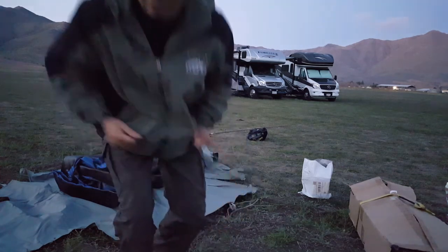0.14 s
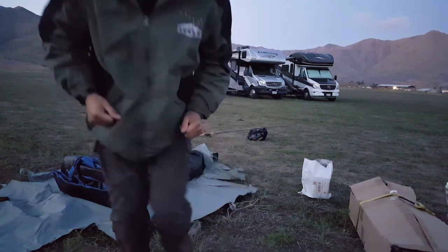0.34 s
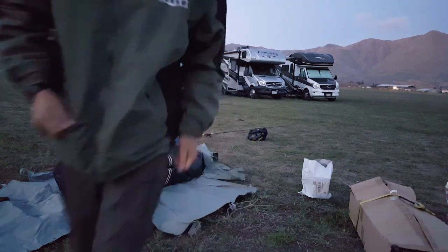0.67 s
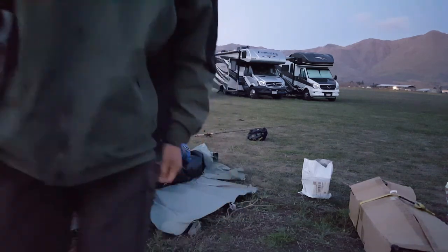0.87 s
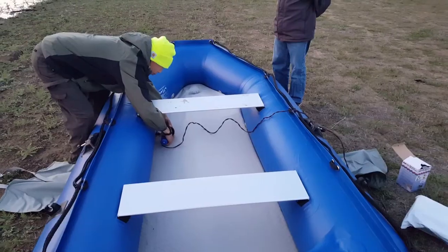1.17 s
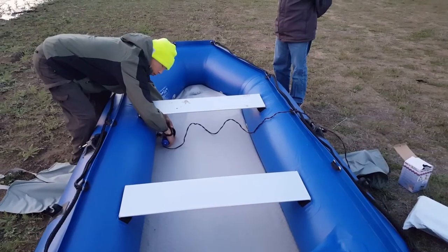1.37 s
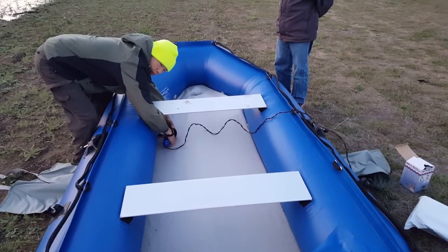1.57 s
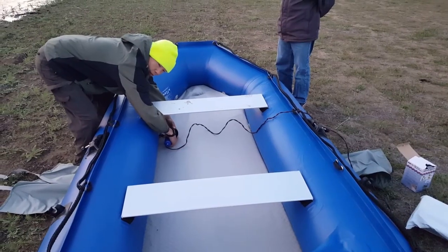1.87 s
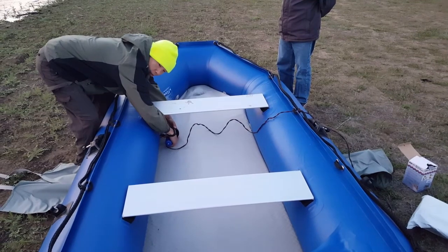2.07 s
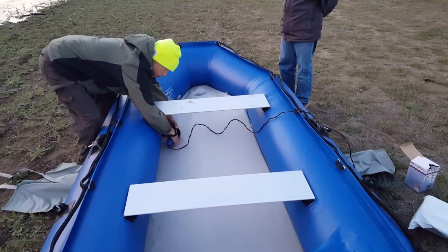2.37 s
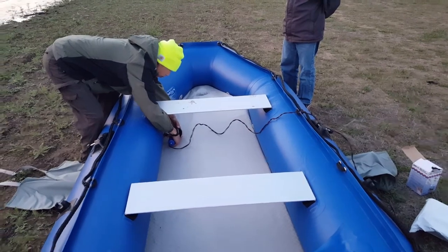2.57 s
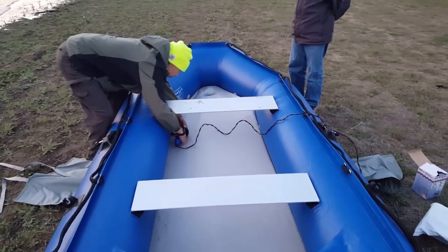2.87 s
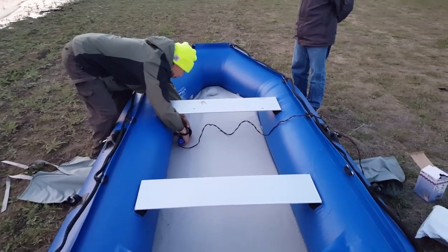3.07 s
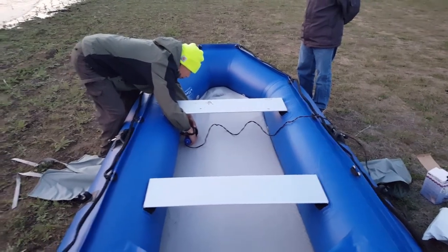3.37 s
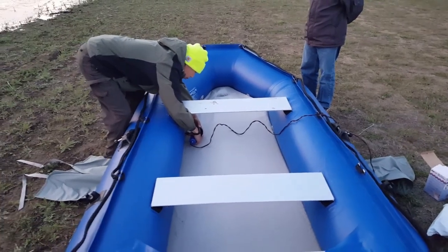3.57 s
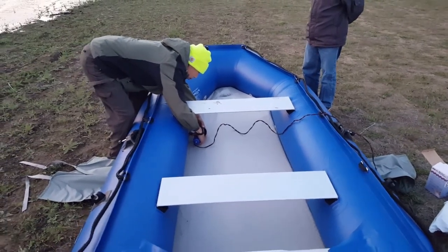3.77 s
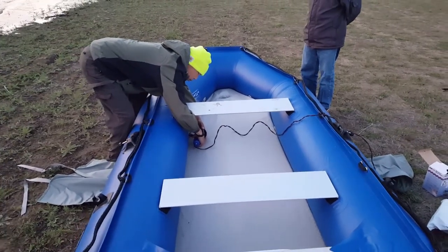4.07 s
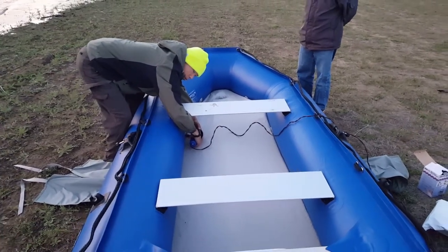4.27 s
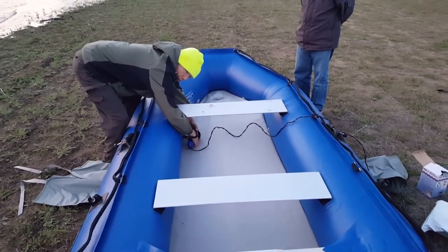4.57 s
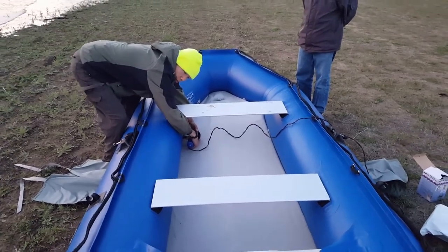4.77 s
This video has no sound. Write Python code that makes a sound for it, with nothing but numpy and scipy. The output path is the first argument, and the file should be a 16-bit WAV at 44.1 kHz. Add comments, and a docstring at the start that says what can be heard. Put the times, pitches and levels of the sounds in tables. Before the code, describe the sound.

Outdoors on open grass, a person in a nylon jacket passes close to the microphone with swishes, dull crunching steps and low rumble. After about a second this cuts abruptly to a small electric pump already running at an inflatable boat: a piercing high whine, buzzing motor hum and rushing, hissing air, with light wind puffs and a couple of knocks. Stereo, close, no obvious room echo.

```python
"""Lakeside campsite, walk and inflatable boat pump

Someone in a nylon jacket walks past over grass, above a low outdoor rumble: shaped noise and short crunches.
Abruptly a small electric air pump is running inside an inflatable boat: tones locked to one shaft angle
make a piercing blade whine that creeps up in pitch, and motor tones under it. Shaped noise makes the air
rushing through housing and valve, whose tube sings. A light breeze touches the microphone; a few knocks fall."""
import sys
import numpy as np
from scipy import signal
from scipy.fft import rfft, irfft
from scipy.io import wavfile

SR = 44100
rng = np.random.default_rng(int(sys.argv[2]) if len(sys.argv) > 2 else 0)


def digitize_waveform(pressure):
    """Quantize a signal to 16-bit integers and store it at the path in sys.argv[1].

    Rows of a 2-D input are taken as channels; values are limited to [-1, 1].
    """
    field = np.atleast_2d(pressure).T
    bounded = np.clip(field, -1, 1)
    quanta = np.round(bounded * 32767).astype(np.int16)
    wavfile.write(sys.argv[1], SR, quanta)


N = 217796
T = np.arange(N) / SR
HZ = np.maximum(np.arange(N // 2 + 1) * SR / N, 1)
WALK_END_S, PUMP_ON_S = 1.113, 1.1235
CUTOFF_HZ = 14480

# Low rumble during the walk. Each row: time in seconds, level in dB.
RUMBLE_LEVEL = [(0, -57.5), (.25, -59), (.45, -56), (.62, -56), (.8, -51), (1.11, -54.5)]
# Colours of the rumble, the open field and the nylon. Each row: frequency in Hz, density in dB per Hz.
RUMBLE_COLOUR = [(20, -36), (45, -9), (75, 4.5), (100, 2), (135, 0), (250, -7.5), (500, -48)]
FIELD_COLOUR = [(100, -5), (250, -2), (450, -1), (900, -5), (1500, -9.5), (2500, -17), (4000, -24.5),
                (9000, -35.5), (14500, -51)]
JACKET_COLOUR = [(200, 3), (800, 4.5), (1800, 6.5), (3000, 0), (5000, -4.5), (8500, -4), (10500, -13),
                 (14000, -10)]
# Nylon rubs at each swing of arm or leg. Each row: centre in seconds, length in seconds, level in dB.
SWISHES = [(.02, 0.092, -61.5), (0.321, 0.11, -59.5), (.5, .08, -60), (.79, 0.15, -55), (1.058, 0.098, -58)]
JACKET_REST_DB = -67
# Steps and small knocks. Each row: start in seconds, level in dB, centre in Hz, t60 in seconds.
STEPS = [(0.141, -42.5, 640, 0.038), (0.167, -47.5, 1210, 0.038), (0.284, -54, 1590, 0.064),
         (0.29, -42, 490, 0.093), (0.292, -46.5, 1480, 0.031), (0.332, -45, 376, 0.077),
         (.577, -51, 1400, .025), (0.576, -56, 8000, 0.018), (0.736, -52, 900, 0.041),
         (.828, -51.5, 1830, .07), (0.846, -46, 423, 0.13), (0.8882, -49, 550, 0.057),
         (3.261, -42, 227, 0.096), (3.266, -33.5, 750, 0.054), (3.614, -48, 197, 0.077)]

# Puffs of breeze on the microphone.
# Each row: centre in seconds, length in seconds, low wind in dB, buffet in dB (both before the lumps).
PUFFS = [(1.165, 0.26, -60, -77), (1.47, 0.091, -53.5, -70), (1.62, .1, -72, -63), (1.985, .06, -58, -64),
         (2.326, .1, -58, -71), (2.754, 0.049, -54, -76), (2.874, 0.11, -53.5, -59),
         (2.972, 0.057, -57, -68), (3.273, 0.13, -56, -51.5), (3.424, 0.071, -56, -53),
         (3.56, 0.097, -58, -56), (3.683, 0.098, -66, -49.5), (4.24, 0.22, -57, -69),
         (4.482, 0.12, -57, -58.5), (4.88, 0.066, -56, -58)]
CALM_WIND_DB, CALM_BUFFET_DB = -70.5, -68.5
# Colours of low wind and of buffet. Each row: frequency in Hz, density in dB per Hz.
WIND_COLOUR = [(20, -31), (45, -8.5), (80, 2), (130, -3), (200, -9), (400, -26.5)]
BUFFET_COLOUR = [(30, -30), (70, -6), (140, -3.5), (230, -0.5), (380, -7.5), (650, -9.5), (1200, -32)]

# Stereo image of each noise. Each row: frequency in Hz, left-right likeness (-1 to 1), left minus right in dB.
FIELD_STEREO = [(60, 0.9, -0.5), (284, 0.93, 0.5), (630, 0.7, 1), (1380, 0.13, 2.5), (3000, 0.44, 1),
                (4280, 0.23, -4), (8140, 0.12, 5), (13900, -0.2, 7)]
WIND_STEREO = [(60, .05, 0), (300, 0.084, 1)]
PUMP_STEREO = [(150, 0.46, .5), (700, 1, 0), (1300, 0.87, -0.5), (2370, 0.46, 1.5), (3370, 0.67, 0.5),
               (4540, -0.14, -2), (6280, -0.35, -8.5), (8200, 0.16, 12), (14100, -0.12, 1.5)]

# Air flow through the pump. Each row: time in seconds, flow in dB (the hiss lies a fixed step above it).
FLOW = [(1.16, -49.5), (1.59, -49), (2.08, -49), (3.87, -47.5), (4.9, -48.5)]
HISS_OVER_FLOW_DB = 6.5
RUSH_DB, RUSH_FOLLOWS = -40.5, .7  # rush at mean flow; its share of the flow's swing in dB
# Surges of air through the valve. Each row: centre in seconds, length in seconds, lift of the rush in dB.
SURGES = [(1.338, .1, 1.5), (1.604, 0.19, 2.5), (1.852, 0.064, 1), (2.12, 0.13, 0.9), (2.415, 0.18, 1.5),
          (2.667, .16, 1.5), (2.94, 0.11, 1.6), (3.263, 0.15, 2), (3.473, 0.051, 1), (3.66, 0.31, 2),
          (3.944, 0.19, 1), (4.468, 0.21, 2), (4.72, 0.07, 1.64)]
# Colours of rush and hiss. Each row: frequency in Hz, density in dB per Hz.
RUSH_COLOUR = [(50, -45), (150, -22), (350, -28), (420, -12.5), (510, -15), (580, -8.5), (1000, -5.5),
               (1090, -12), (1350, -2), (1620, -10), (2100, -4.5), (3200, -5.5), (3800, -14), (5000, -20),
               (8000, -47)]
HISS_COLOUR = [(2000, -12), (3800, -5.5), (4600, -0.5), (5200, 3), (6300, 0), (6800, 3), (8100, -0.5),
               (8800, -4.5), (9600, -15), (12400, -7.5), (13400, -3.5), (14400, -6)]
# Air resonances of housing and outlet. Each row: frequency in Hz, width in Hz, lift in dB.
HOUSING = [(761, 216, 7.5), (1158, 98, 10.5), (2460, 170, 5.5)]
OUTLET = [(5500, 300, 0.5), (6230, 180, 2), (8300, 240, -0.5)]

# The valve tube resonates close to the fourth multiple of the shaft rate.
# It sings more as the boat fills, and most in the surges.
TUBE_HZ, TUBE_WIDTH_HZ = 1158.6, 15
TUBE_START_DB, TUBE_RISE_DB_PER_S, TUBE_DB_PER_SURGE_DB = -56.5, 2.5, 4.5

# The motor creeps towards its top speed; SETTLE_S is the time constant.
START_TURNS_PER_S, TOP_TURNS_PER_S, SETTLE_S = 281.18, 293.21, 3.734
# Motor and housing tones. Each row: multiple of the shaft rate, left in dB rms, right in dB rms,
# growth over the run in dB, waver in dB (only a share of it is used in common and in each channel).
MOTOR = [(.75, -63.5, -61.5, -0.5, 0.5), (1, -59, -58.5, 0.5, 0.5), (2, -62.5, -67.5, 6, -3.5),
         (2.5, -59.5, -59, 4, 5), (6.75, -59, -69, -4, 8), (7.5, -53.5, -53, 0.5, 4),
         (8, -55.5, -53.5, 4.5, 1.5), (9, -53, -52.5, -4, -0.5), (10, -58, -70, -13, 7),
         (12.5, -69, -60, -14, 5), (13.5, -63.5, -76, -7, 3.5), (15, -63, -74, -4, 1),
         (18, -73, -64, 23, 0)]
# Hum on the fifth multiple. Each row: time in seconds, level in dB rms.
HUM = [(1.12, -55), (1.3, -55), (1.56, -47), (3.6, -47), (3.95, -53), (4.94, -51)]

# The blade whine as pump and listener move.
# Each row: time in seconds, left peak in dB, right peak in dB, lead of the left channel in radians.
WHINE = [(1.12, -36.5, -32, -0.5), (1.36, -35.5, -28, -2.5), (1.6, -32, -31.5, .5),
         (1.85, -48.5, -27.5, 2.5), (2.12, -30, -21, -4.5), (2.36, -42, -26, -4.5),
         (2.7, -35.5, -22.5, -1.5), (3.05, -45, -29.5, -1.5), (3.35, -40, -28.5, -3), (3.6, -50, -33.5, 0),
         (3.92, -34, -31.5, -5), (4.32, -40, -27.5, -2.5), (4.48, -36.5, -27, -2.5),
         (4.62, -40, -29.5, -5.5), (4.94, -41.5, -34, 1)]
# Echoes off the boat briefly cancel the whine; a negative dip is a lift.
# Each row: centre in seconds, length in seconds, left dip in dB, right dip in dB.
FADES = [(1.26, 0.061, 1, 12), (1.498, 0.062, 6, 26), (1.795, 0.039, 0, 11), (1.994, 0.15, -0.5, 13),
         (2.08, 0.063, -2, 20), (2.32, 0.042, 1, 15), (2.515, 0.043, -5, 11.5), (2.659, 0.043, 1, 13.5),
         (2.82, 0.041, 12, 21), (3.128, 0.019, -4, 11), (3.45, 0.071, 10, 3), (3.643, 0.04, 0, 14),
         (3.883, 0.071, -0.5, 6), (4.103, 0.071, 13, -1.5), (4.2, 0.073, -1, 6.5), (4.494, 0.056, 0, 12),
         (4.81, 0.044, 8, 12)]
# The whine's octave, then the top whistle. Each row: time in seconds, left peak in dB, right peak in dB.
OCTAVE = [(1.12, -38.5, -63), (1.5, -47.5, -57), (1.74, -38, -52), (2.15, -45, -45), (2.66, -35.5, -42),
          (2.82, -48, -55), (3.1, -45.5, -52.5), (3.85, -39.5, -56), (4.65, -43, -51), (4.94, -58, -54)]
WHISTLE = [(1.12, -46, -59), (1.56, -43.5, -55), (2.2, -50, -59), (2.76, -44, -57), (3.2, -59.5, -71),
           (3.55, -52, -59), (4.08, -47, -45.5), (4.94, -60, -45.5)]


def from_db(db):
    """Decibels to gain."""
    return 10 ** (np.asarray(db) / 20)


def rms_one(x):
    """Scale to unit power."""
    return x / np.sqrt(np.mean(x ** 2))


def in_time(rows):
    """Each column of a curve at every sample."""
    s, *columns = np.transpose(rows)
    return np.array([np.interp(T, s, column) for column in columns])


def in_frequency(rows):
    """Each column of a spectrum at every frequency bin, on a log frequency scale."""
    hz, *columns = np.transpose(rows)
    return np.array([np.interp(np.log(HZ), np.log(hz), column) for column in columns])


def swell(s, length_s):
    """A smooth bump of height 1 centred on s, length_s wide at half height."""
    return .5 ** ((2 * (T - s) / length_s) ** 2)


def notch(s, length_s):
    """A pointed dip of depth 1, length_s wide at half depth, as when two paths cancel."""
    return .5 ** (2 * np.abs(T - s) / length_s)


def drift(rate_hz):
    """Slow random wander of spread 1: white noise rolled off above rate_hz."""
    spectrum = rfft(rng.standard_normal(N))
    return rms_one(irfft(spectrum / (1 + (HZ / rate_hz) ** 2) ** 2, N))


def resonate(x, hz, width_hz):
    """A two-pole resonance with gain 1 on top."""
    r = np.exp(-np.pi * width_hz / SR)
    zeros = np.array([1, 0, -1]) * (1 - r * r) / 2
    poles = [1, -2 * r * np.cos(2 * np.pi * hz / SR), r * r]
    return signal.lfilter(zeros, poles, x)


def resonate_twice(x, hz, width_hz):
    """Two equal resonances in a row at unit power, for steeper skirts."""
    return rms_one(resonate(resonate(x, hz, width_hz), hz, width_hz))


def noise(colour, stereo, resonances=(), lead_s=0):
    """Coloured stereo noise of unit power, lifted at its resonances; the left channel leads by lead_s."""
    colour_db = in_frequency(colour)[0]
    for hz, width_hz, lift_db in resonances:
        colour_db = colour_db + lift_db / (1 + (2 * (HZ - hz) / width_hz) ** 2)
    alike, pan_db = in_frequency(stereo)
    alike = np.clip(alike, -1, 1)
    mid, side = rfft(rng.standard_normal((2, N)))
    sides = np.array([[1], [-1]])  # left, right
    pair = np.sqrt(1 + alike) * mid + sides * np.sqrt(1 - alike) * side
    pair = pair * np.exp(1j * np.pi * HZ * lead_s * sides)
    return rms_one(irfft(pair * from_db(colour_db + sides * pan_db / 2), N))


def walk():
    """Low rumble, the open field, and nylon rubbing in swells: noise shaped in colour and level."""
    lead_s = .0001
    rubbing = from_db(JACKET_REST_DB)
    for s, length_s, level_db in SWISHES:
        rubbing = rubbing + from_db(level_db) * swell(s, length_s)
    rumble = from_db(in_time(RUMBLE_LEVEL)) * noise(RUMBLE_COLOUR, FIELD_STEREO, lead_s=lead_s)
    field = from_db(-54.0 + 0.88 * drift(28)) * noise(FIELD_COLOUR, FIELD_STEREO, lead_s=lead_s)
    jacket = rubbing * from_db(1.2 * drift(90)) * noise(JACKET_COLOUR, FIELD_STEREO, lead_s=lead_s)
    return rumble + field + jacket


def breeze(lumpy_db):
    """Puffs of lumpy eddies at the microphone: low wind and a higher buffet, nearly unlike left and right."""
    levels = from_db([[CALM_WIND_DB], [CALM_BUFFET_DB]])
    for s, length_s, *levels_db in PUFFS:
        levels = levels + np.outer(from_db(levels_db), swell(s, length_s))
    wind, buffet = levels
    lumps = from_db(lumpy_db * np.array([drift(41), drift(18)]))  # left, right
    return lumps * (wind * noise(WIND_COLOUR, WIND_STEREO) + buffet * noise(BUFFET_COLOUR, WIND_STEREO))


def steps(width_share, apart, onset_db):
    """Each footfall or knock is a short dying crunch of noise around one pitch, its onset set by onset_db."""
    out = np.zeros((2, N))
    for s, level_db, hz, t60 in STEPS:
        grit = rng.standard_normal(N) + apart * rng.standard_normal((2, N))
        crunch = resonate_twice(grit, hz, width_share * hz)
        age = np.maximum(T - s, 0)
        envelope_db = level_db - 60 * age / t60 + onset_db * np.exp(-age / 0.0055)
        out += crunch * (T >= s) * from_db(envelope_db)
    return out


def surge_db():
    """How far the surges lift the rush of air."""
    return sum(lift_db * swell(s, length_s) for s, length_s, lift_db in SURGES)


def air(angle, chop):
    """Air rushes through the housing in small surges; rush and hiss are chopped a little by the turning."""
    flow_db, = in_time(FLOW)
    rush_db = RUSH_DB + RUSH_FOLLOWS * (flow_db - flow_db.mean()) + surge_db()
    rush_gain = from_db(rush_db + 0.89 * drift(34))
    rush = rush_gain * noise(RUSH_COLOUR, PUMP_STEREO, HOUSING, lead_s=.00003)
    hiss_gain = from_db(flow_db + HISS_OVER_FLOW_DB + 0.7 * drift(40))
    hiss = hiss_gain * noise(HISS_COLOUR, PUMP_STEREO, OUTLET)
    pulsing = 1 + chop * (np.cos(angle) + np.cos(angle / 2) + np.cos(2 * angle))
    return pulsing * (rush + hiss)


def tube(angle, turbulence):
    """The fourth multiple and the turbulence both drive the valve tube: an unsteady, hollow tone."""
    fourth = np.sqrt(2) * np.sin(4 * angle)
    ringing = resonate_twice(rng.standard_normal(N), TUBE_HZ, TUBE_WIDTH_HZ)
    filling_db = TUBE_RISE_DB_PER_S * (T - PUMP_ON_S)
    level_db = TUBE_START_DB + filling_db + TUBE_DB_PER_SURGE_DB * surge_db()
    return from_db(level_db + [[-.4], [.4]]) * rms_one(fourth + turbulence * ringing)


def shaft_speed():
    """Turns per second: an exponential approach to top speed."""
    running_s = np.maximum(T - PUMP_ON_S, 0)
    return TOP_TURNS_PER_S - (TOP_TURNS_PER_S - START_TURNS_PER_S) * np.exp(-running_s / SETTLE_S)


def shaft_angle(wobble):
    """The motor gathers speed slowly and never turns quite evenly; angle in radians."""
    return 2 * np.pi * np.cumsum(shaft_speed() * (1 + wobble * drift(23.4))) / SR


def motor(angle, path_spread):
    """Tones locked to the shaft, growing or fading with speed; phase wanders more on the upper ones."""
    hum_db = in_time(HUM)[0] + [[.7], [-.7]] + .8 * drift(15)
    out = from_db(hum_db) * np.sin(5 * angle + [[.3], [0]])
    speed = shaft_speed()
    load = (speed - speed.mean()) / np.ptp(speed)
    for multiple, left_db, right_db, growth_db, waver_db in MOTOR:
        multiple = np.round(multiple * 4) / 4  # multiples fall on quarters of the shaft rate
        shared_db = growth_db * load + 0.61 * waver_db * drift(9.7)
        start = rng.uniform(0, 2 * np.pi)
        for channel, level_db in enumerate((left_db, right_db)):
            path = path_spread * multiple * drift(2.6)
            gain = from_db(level_db + shared_db + .5 * waver_db * drift(17.0))
            out[channel] += gain * np.sin(multiple * angle + start + path)
    return np.sqrt(2) * out  # rms to peak


def blade_tone(angle, levels_db, lead, flutter):
    """A clean high tone, left phase ahead by lead radians; turbulence makes it flutter."""
    shimmer = 1 + flutter * np.array([drift(48), drift(50)])
    return from_db(levels_db) * shimmer * np.sin(angle + lead * np.array([[1], [0]]))


def whine(angle):
    """Blade passing, 20 per turn, with its brief fades; its octave, and a thin whistle above."""
    *levels_db, lead = in_time(WHINE)
    fade_db = sum(np.outer(dips_db, notch(s, length_s)) for s, length_s, *dips_db in FADES)
    blades = blade_tone(20 * angle, levels_db - fade_db, lead + 0.18 * drift(15), flutter=0.094)
    octave = blade_tone(40 * angle, in_time(OCTAVE), 1.6 + 0.67 * drift(0.59), flutter=0.14)
    whistle = blade_tone(45 * angle, in_time(WHISTLE), 1.3 + 0.65 * drift(3.1), flutter=0.087)
    return blades + octave + whistle


def scene():
    """The walk breaks off, and after a blink of near quiet the pump is already running."""
    walking = np.interp(T, [WALK_END_S - .002, WALK_END_S + .002], [1, .2]) * (T < PUMP_ON_S)
    pumping = np.clip((T - PUMP_ON_S) / .002, 0, 1)
    footfalls = steps(width_share=0.6, apart=0.65, onset_db=-1.0)
    angle = shaft_angle(wobble=.00007)
    pump = air(angle, chop=0.034) + tube(angle, turbulence=0.76)
    pump = pump + motor(angle, path_spread=0.057) + whine(angle)
    return walking * walk() + footfalls + pumping * (breeze(lumpy_db=3.0) + pump)


def record(dry):
    """The top is cut steeply by a 12th-order elliptic low-pass."""
    return signal.sosfilt(signal.ellip(12, .1, 80, CUTOFF_HZ, fs=SR, output="sos"), dry)


dry = scene()
out = record(dry)
digitize_waveform(out)
```